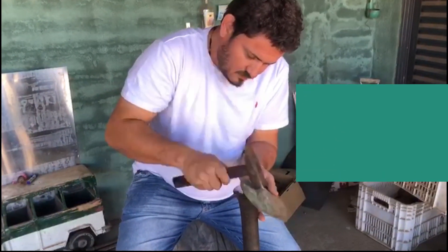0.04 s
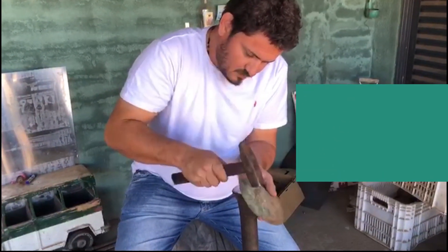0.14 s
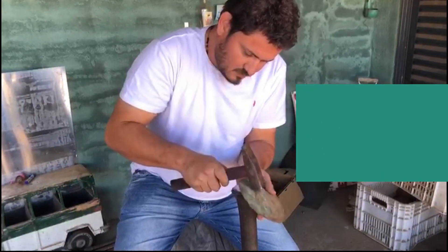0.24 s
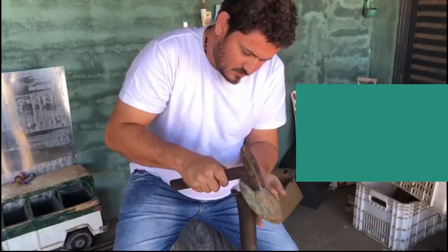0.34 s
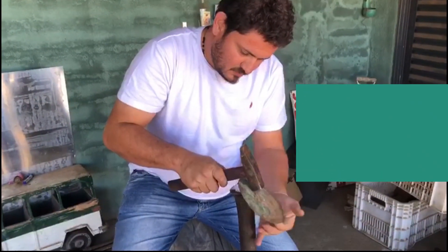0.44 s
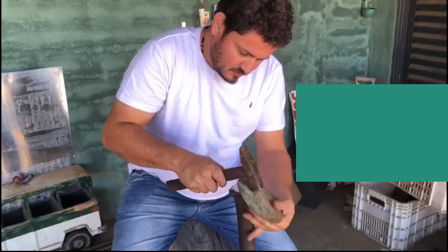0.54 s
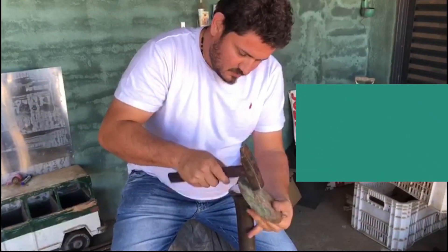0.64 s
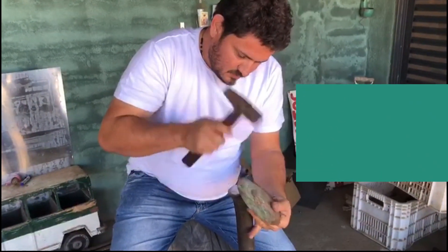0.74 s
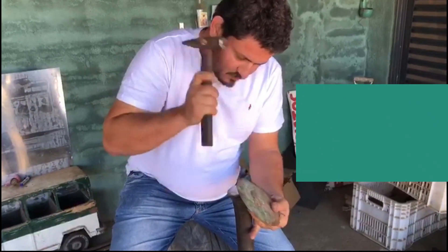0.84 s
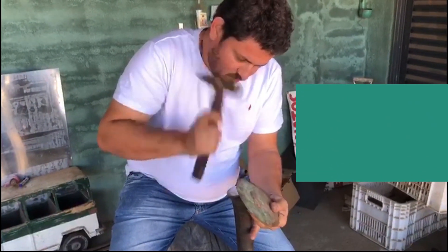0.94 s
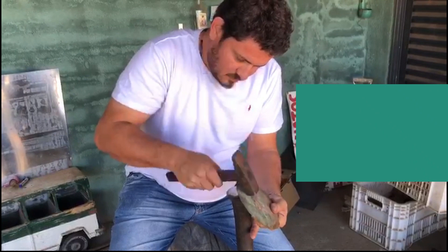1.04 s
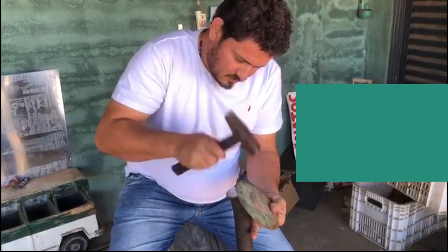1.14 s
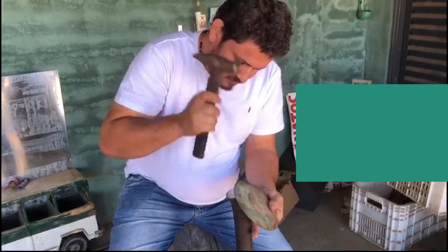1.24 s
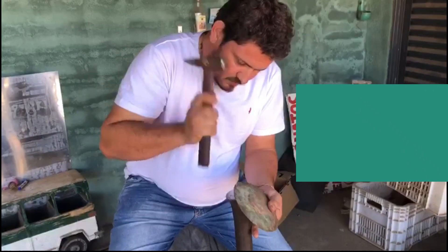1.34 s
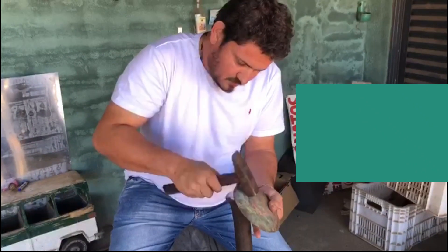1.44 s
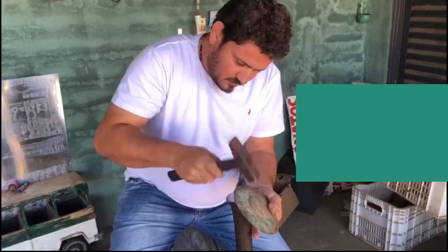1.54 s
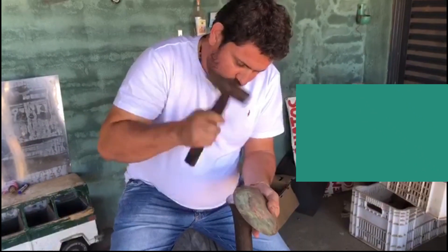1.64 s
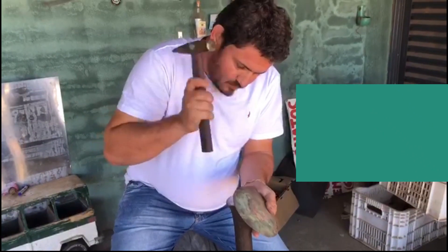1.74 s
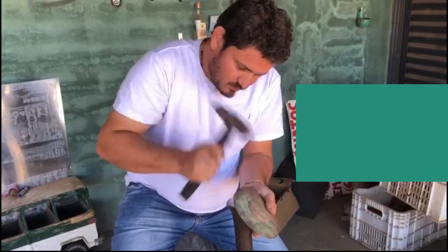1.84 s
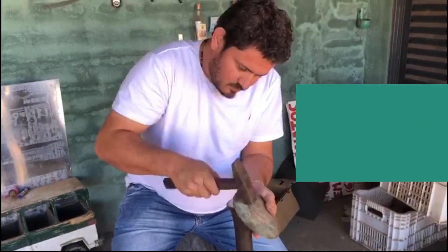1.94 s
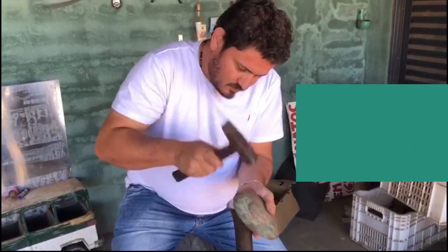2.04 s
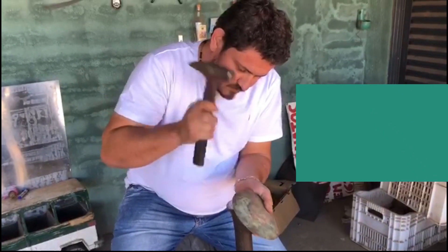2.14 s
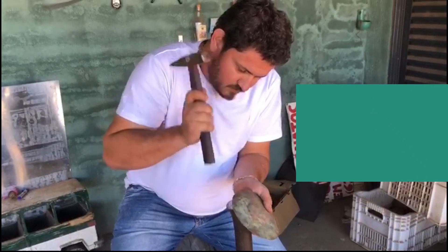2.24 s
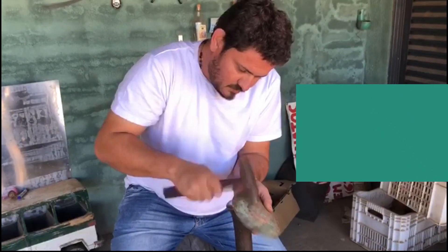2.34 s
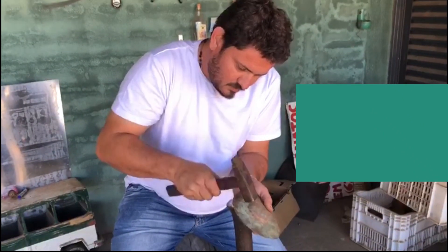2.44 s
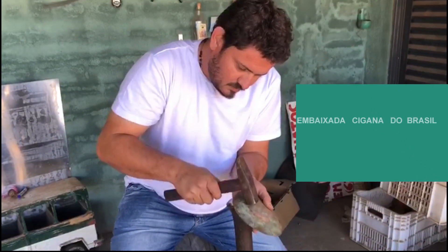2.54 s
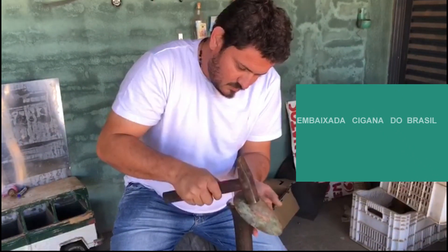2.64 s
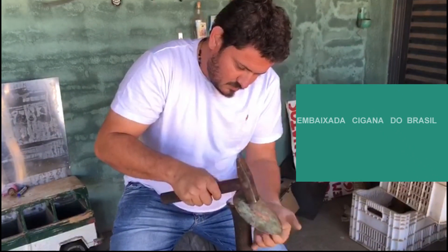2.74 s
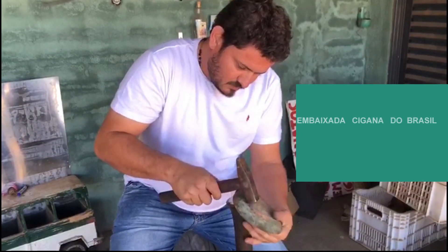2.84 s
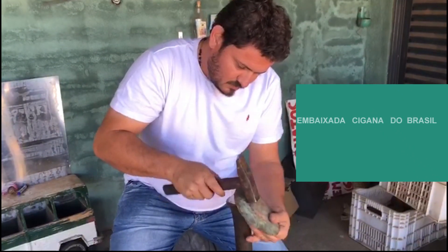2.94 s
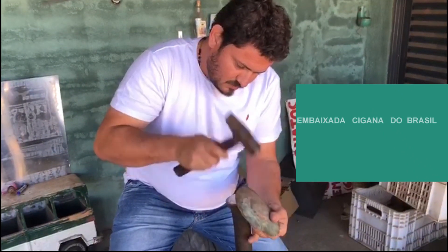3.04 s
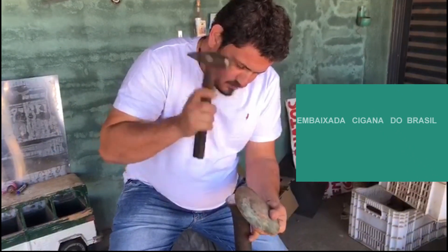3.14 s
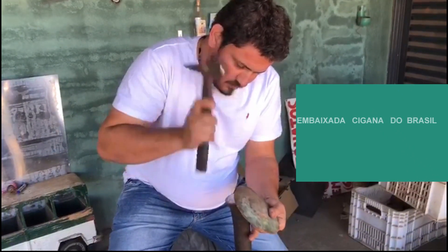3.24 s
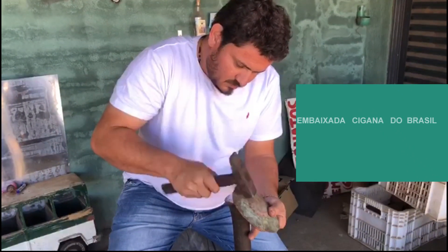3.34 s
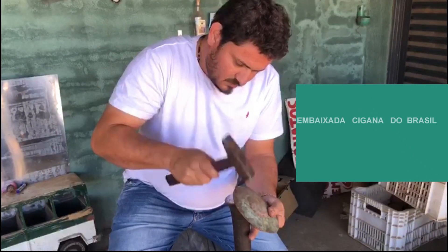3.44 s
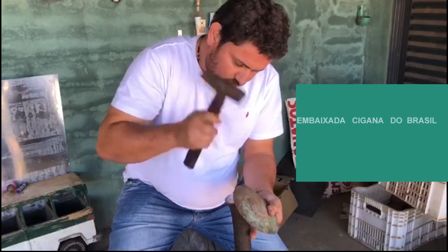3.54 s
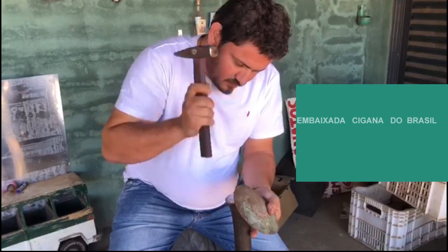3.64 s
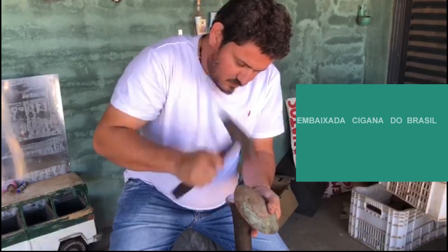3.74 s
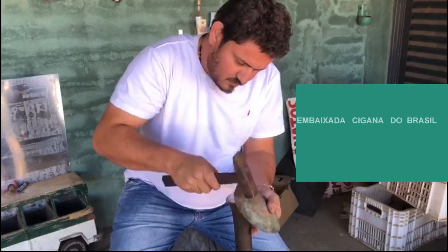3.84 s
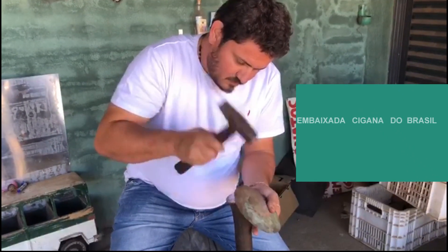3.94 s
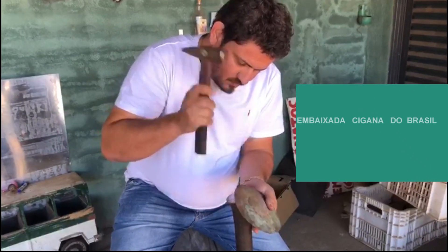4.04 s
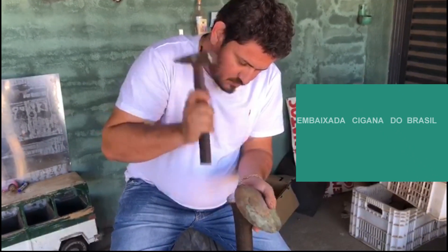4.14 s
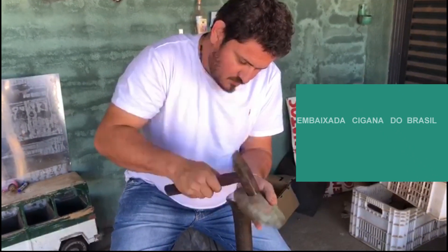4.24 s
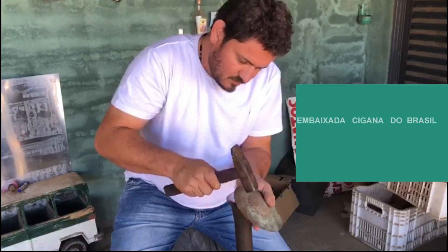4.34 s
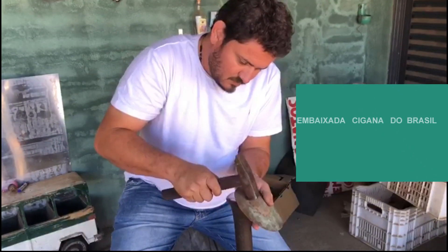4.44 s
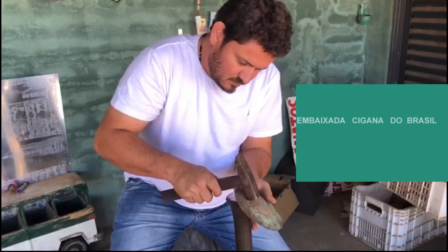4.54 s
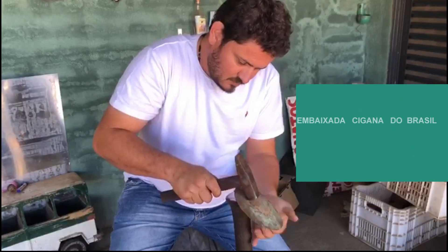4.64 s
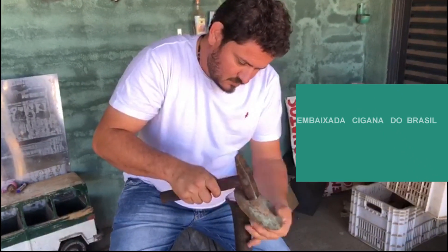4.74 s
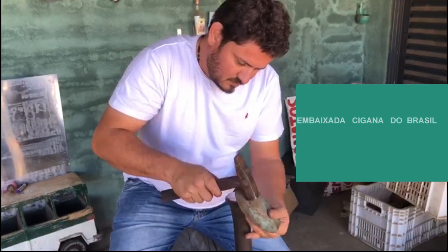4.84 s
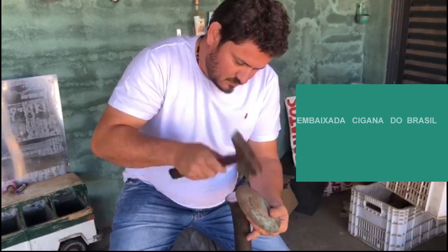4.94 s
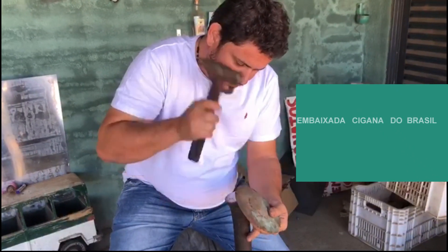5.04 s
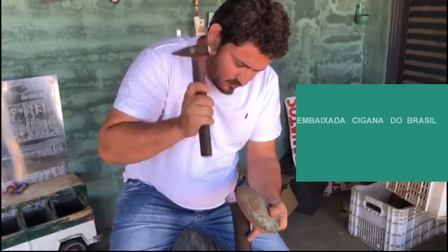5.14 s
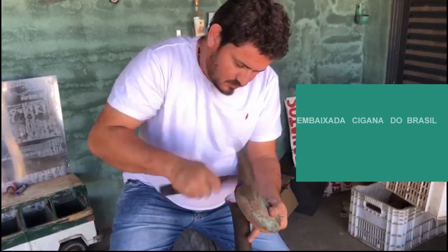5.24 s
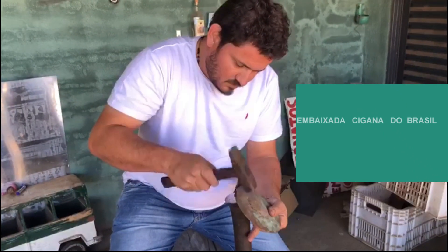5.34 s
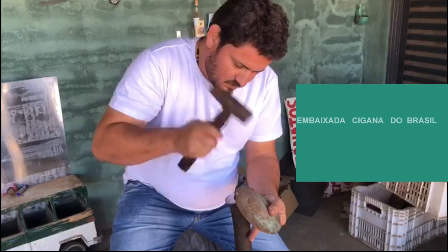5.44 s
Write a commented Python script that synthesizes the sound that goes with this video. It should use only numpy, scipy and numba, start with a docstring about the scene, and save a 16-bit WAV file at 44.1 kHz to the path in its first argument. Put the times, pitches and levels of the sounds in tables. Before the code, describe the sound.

Close mono sound of metalworking: sharp, bright hammer cracks with brief high steel ringing, a dull knock and short boomy reflections. Blows come steadily, with small double-bounce taps on loose copper and slight scraping as the dish turns. A soft low outdoor rumble continues throughout, with barely audible bird whistles. The peaks sound squashed and the extreme treble is cut.

```python
"""The fading ring of an earlier hammer blow comes first, over a low rumble; then a smith beats a small copper dish.
Nine full blows and three light, chattering taps land on a steel stake in a hard-walled workshop.
Each contact is a noise crack and thud plus decaying tones for steel, copper and boom; reflections follow.
The turning dish scrapes (uneven noise) and a far bird whistles (gliding tones). A limiter holds the blows level."""
import sys
import numpy as np
from scipy import signal
from scipy.fft import rfft, irfft
from scipy.io import wavfile
from scipy.ndimage import uniform_filter1d, minimum_filter1d
from numba import njit

SR = 44100
rng = np.random.default_rng(int(sys.argv[2]) if len(sys.argv) > 2 else 0)


def put_to_file(sound):
    """Save the sound as 16-bit audio at rate SR, in the file named by the first command-line argument."""
    columns = np.atleast_2d(sound).T  # one column per channel
    safe = np.clip(columns, -1, 1)
    whole_steps = np.round(safe * 32767)
    wavfile.write(sys.argv[1], SR, whole_steps.astype(np.int16))


N = 242550

# low rumble, its tone colour: [pitch_hz, relative_level_db]
RUMBLE_COLOUR = [(20, -27), (40, -15), (62, 3), (110, -3.5), (170, -3.5), (260, -16.5), (600, -22),
                 (1200, -25.5), (3000, -36), (5000, -42), (8000, -52), (12000, -61.5)]
# how the workshop's reflections die away: [pitch_hz, early_t60_s, late_t60_s, late_relative_to_early_db]
ROOM_DECAY = [(100, 0.16, 1, -4), (293, 0.52, 1, -11), (875, 0.36, 0.8, -18.5), (2570, 0.3, 0.78, -21),
              (5100, 0.26, 0.61, -21), (7850, 0.2, 0.44, -26.5), (11800, 0.12, 0.32, -28)]
# whistles of a bird outside: [start_s, length_s, start_pitch_hz, end_pitch_hz, level_db]
BIRD_CHIRPS = [(0.778, 0.073, 3400, 3280, -73), (0.818, 0.06, 3210, 2915, -60.5),
               (0.837, 0.065, 2345, 2405, -59.5), (5.11, 0.15, 3630, 2970, -63),
               (5.217, 0.41, 2876, 2950, -57.5)]
# copper rubbing on steel, its tone colour: [pitch_hz, relative_level_db]
SCRAPE_COLOUR = [(200, -24), (800, 6), (1500, 9.5), (2500, -17), (5000, -7.5), (8000, -12.5),
                 (12000, -18.5)]
# the dish slides on the stake: [middle_s, length_s, level_db, tilt_db_per_octave]
DISH_SLIDES = [(0.502, 0.18, -45, 0), (0.598, 0.067, -63, -13), (2.867, 0.18, -56, -5.5),
               (3.108, 0.073, -67, 5), (4.966, 0.017, -60, 0.5), (5.02, 0.15, -67, 3),
               (5.167, 0.15, -51, -8)]
# the sharp crack of a contact, its tone colour: [pitch_hz, relative_level_db]
CRACK_COLOUR = [(100, -47.5), (400, -27.5), (850, -14), (1150, -10.5), (1600, 1.5), (2300, -2.5),
                (3400, 6.5), (4300, -1), (6300, 0), (8000, -2.5), (9500, -6.5), (11500, -6.5),
                (14000, -32.5)]
# the dull thud of a contact, its tone colour: [pitch_hz, relative_level_db]
THUD_COLOUR = [(40, -25), (90, -6), (190, -3.5), (300, 7), (420, -9), (700, -4.5), (1100, -8), (2000, -7.5),
               (5000, -47.5)]
# ringing tones of hammer head and stake: [pitch_hz, relative_level_db, t60_s]
STEEL_MODES = [(3219, -1.5, .11), (3240, 0, .14), (3334, -13, .1), (3458, -16, .1), (3735, -12, .1),
               (4990, -18, .1), (6408, -9, .11), (8531, -11, .11), (8548, -7, .18), (11051, -27, .16)]
# ringing tones of the hand-damped dish: [pitch_hz, relative_level_db, t60_s]
COPPER_MODES = [(1105, -10, .13), (1525, -8, .1), (1641, -13, .05), (1827, -15, .05), (2095, -18, .05),
                (2645, -11, .08), (3030, -16, .04), (3262, -15, .06), (4305, -18, .04), (7640, -18, .04)]
# low resonances of stake and room that the thud wakes: [pitch_hz, relative_level_db, t60_s]
BOOM_MODES = [(112, -12, .4), (168, -9, .3), (182, -14, .6), (238, 0, .42), (268, -7, .15), (305, -3, .24),
              (398, -10, .18), (550, -10, .15), (667, -5, .2), (726, -6, .2), (775, -9, .18),
              (860, -10, .18)]
# the hammer drops back onto the dish: [start_s, force_db, first_touch_relative_to_landing_db, copper_ring_db]
HAMMER_TAPS = [(0.353, -23, -6, 10.5), (2.6545, -25, -5, 12), (4.5612, -24, 4.5, 11)]
# full blows; a negative start leaves only the tail: [start_s, force_db, thud_db, top_steel_modes_db]
HAMMER_BLOWS = [(-.42, 4.5, 2, -2), (0.169, -3.5, -3, -1.5), (1.1286, -2, -2, 0), (1.557, -3, -2, 0),
                (2.0079, -3.5, -1.5, 1.5), (2.4804, -4, -2.5, 0.5), (3.4537, -2.5, -0.5, -3),
                (3.899, -3, 4, -1), (4.3595, -3.5, -0.5, -2.5), (5.3806, -5.5, 1, -1)]

T = np.arange(SR) / SR  # one second of time after a contact, in seconds

# base levels in dB; each contact then adds its own changes to most of them
RUMBLE_DB, CRACK_DB, THUD_DB = -45.5, -14, -30.5
STEEL_DB, COPPER_DB, BOOM_DB = -18.5, -30, -32.5
# a tap touches, lands once the dish is pressed onto the stake, and rebounds weakly
LANDING_S, REBOUND_S, REBOUND_DB = .004, .015, -2.5
# dB changes for each kind of contact: a blow rings the steel, a tap the loose copper
BLOW_THUD_DB, BLOW_STEEL_DB, BLOW_TOP_DB, BLOW_COPPER_DB = -2, -2.5, 3, -5.5
TAP_THUD_DB, TAP_STEEL_DB, TAP_TOP_DB = -9.5, -16.5, -1


def undb(db):
    """Turn decibels into a gain."""
    return 10 ** (np.asarray(db) / 20)


def level(x, db):
    """Set a sound to a given rms (average) level."""
    return x * undb(db) / np.sqrt(np.mean(x ** 2))


def fade(t60):
    """A steady die-away that falls 60 dB in t60 seconds."""
    return np.exp(-np.log(1000) * T / max(t60, 1 / SR))


def rise(seconds):
    """A smooth build-up, about two thirds complete after the given time."""
    return 1 - np.exp(-T / seconds)


def swell(length):
    """A smooth rise and fall over the given seconds."""
    return np.sin(np.pi * np.minimum(T / length, 1))


def add(out, at, x):
    """Mix a sound in at a time in seconds, which may lie before the start."""
    i = int(at * SR)
    part = x[max(-i, 0):len(out) - i]
    first = max(i, 0)
    out[first:first + len(part)] += part


def colour(x, spectrum, tilt_db=0):
    """Shape the tone by (Hz, dB) points and a tilt per octave."""
    hz, db = np.transpose(spectrum)
    octave = np.log2(np.maximum(np.fft.rfftfreq(len(x), 1 / SR), 1))
    gain_db = np.interp(octave, np.log2(hz), db) + tilt_db * octave
    return irfft(rfft(x) * undb(gain_db), len(x))


def walk(rate):
    """Random drift with an rms of 1 over the scene, taking a new value `rate` times a second."""
    k = int(SR / rate)
    steps = np.repeat(rng.standard_normal(N // k + 1), k)
    return level(uniform_filter1d(steps, k)[:N], 0)


def workshop(build_s=0.0036):
    """Reflections: near walls die quickly, the rest of the shed lingers, longest in the bass."""
    noise = rfft(rng.standard_normal(SR))
    octave = np.log2(np.arange(len(noise)) + 1)
    centres = np.log2([row[0] for row in ROOM_DECAY])
    tail = 0
    # each row of shares picks out one pitch band, blending into its neighbours
    for share, (_, early, late, late_db) in zip(np.eye(len(ROOM_DECAY)), ROOM_DECAY):
        band = irfft(noise * np.interp(octave, centres, share), SR)
        tail = tail + band * np.hypot(fade(early), undb(late_db) * fade(late))
    tail = tail * rise(build_s)
    return tail / np.linalg.norm(tail)


def heard(x, room, db, direct_db):
    """Direct sound plus reflections, set to a given level over one second."""
    reflections = signal.fftconvolve(x, room)[:SR]
    return level(undb(direct_db) * x + reflections, db)


def rumble():
    """A low outdoor rumble: coloured noise whose loudness drifts gently."""
    noise = colour(rng.standard_normal(N), RUMBLE_COLOUR)
    return level(noise * undb(0.94 * walk(2.9)), RUMBLE_DB)


def bird(room):
    """Faint, gliding whistles, slightly hoarse from pitch jitter and smeared by the walls."""
    out = np.zeros(N)
    for at, length, start_hz, end_hz, db in BIRD_CHIRPS:
        glide = np.interp(T, [0, length], [start_hz, end_hz])
        hz = glide * (1 + .04 * walk(500)[:SR])
        call = np.sin(2 * np.pi * np.cumsum(hz) / SR) * swell(length)
        # a short call keeps its loudness although the level is set over a whole second
        add(out, at, heard(call, room, db + 10 * np.log10(length), direct_db=1.5))
    return out


def slides(room):
    """Copper dragged over steel: noise made of dense, uneven slips."""
    out = np.zeros(N)
    for middle, length, db, tilt_db in DISH_SLIDES:
        slips = rng.standard_normal(SR) * undb(2 * rng.exponential(size=SR))
        rub = colour(slips, SCRAPE_COLOUR, tilt_db) * swell(length)
        add(out, middle - length / 2, heard(rub, room, db + 10 * np.log10(length), direct_db=6.0))
    return out


def ring(modes, room, detune, direct_db, top_db=0):
    """Decaying tones of struck metal; the pressure of each contact shifts their pitch a little."""
    out = 0
    for hz, db, t60 in modes:
        shifted_hz = hz * (1 + detune * rng.standard_normal())
        tone = np.sin(2 * np.pi * shifted_hz * T) * fade(t60)
        out = out + heard(tone, room, db + top_db * (hz > 6000), direct_db)
    return out


def crack(room):
    """Dense sheet modes, heard as a burst of noise with a short and a longer fade."""
    burst = colour(rng.standard_normal(SR), CRACK_COLOUR)
    burst = burst * rise(0.00081) * (fade(0.021) + 0.11 * fade(0.077))
    return heard(burst, room, CRACK_DB, direct_db=7.5)


def thud(room, thud_db):
    """The knock down the stake; the small dish radiates little bass directly, so it builds up in the room."""
    rough = level(rng.standard_normal(SR) * fade(0.73), -5.5)
    knock = colour(level(room, 0) + rough, THUD_COLOUR)
    return level(knock * rise(0.0055) * fade(0.4), THUD_DB + thud_db)


def boom(thud_db):
    """Low resonances of stake and room: decaying tones woken by the thud."""
    tones = sum(undb(db) * np.cos(2 * np.pi * hz * T) * fade(t60) for hz, db, t60 in BOOM_MODES)
    return level(tones * rise(.008), BOOM_DB + thud_db)


def contact(room, thud_db, steel_db, top_db, copper_db):
    """One contact: a crack, a thud down the stake, steel and copper ringing, and a boom."""
    out = crack(room) + thud(room, thud_db)
    out += undb(STEEL_DB + steel_db) * ring(STEEL_MODES, room, detune=0.0016, direct_db=5.5, top_db=top_db)
    out += undb(COPPER_DB + copper_db) * ring(COPPER_MODES, room, detune=0.007, direct_db=2)
    # the boom starts once the thud has reached the walls
    add(out, 0.014, boom(thud_db))
    return out


def taps(room):
    """The dropped hammer chatters on the loose dish: touch, landing, rebound."""
    out = np.zeros(N)
    for at, force_db, touch_db, copper_db in HAMMER_TAPS:
        for delay, db in [(0, touch_db), (LANDING_S, 0), (REBOUND_S, REBOUND_DB)]:
            tap = contact(room, TAP_THUD_DB, TAP_STEEL_DB, TAP_TOP_DB, copper_db)
            add(out, at + delay, undb(force_db + db) * tap)
    return out


def blows(room):
    """Full blows pin the copper to the stake, so the steel rings most."""
    out = np.zeros(N)
    for at, force_db, thud_db, top_db in HAMMER_BLOWS:
        blow = contact(room, BLOW_THUD_DB + thud_db, BLOW_STEEL_DB, BLOW_TOP_DB + top_db, BLOW_COPPER_DB)
        add(out, at, undb(force_db) * blow)
    return out


def scene():
    """Mix the rumble with the bird, slides, taps and blows, which share one room."""
    room = workshop()
    return (rumble() + bird(room) + slides(room) + taps(room) + blows(room))[None]


@njit
def follow(x, attack, release):
    """Track loudness: rise quickly, sink slowly."""
    out, e = np.empty(len(x)), 0.
    for i in range(len(x)):
        e += (x[i] - e) * (attack if x[i] > e else release)
        out[i] = e
    return out


def limiter(x, top_db, attack_s, release_s):
    """Turn the gain down while the sound is over the ceiling, looking a moment ahead."""
    attack = 1 - np.exp(-1 / (attack_s * SR))
    release = 1 - np.exp(-1 / (release_s * SR))
    envelope = follow(np.abs(x), attack, release)
    gain = np.minimum(1, undb(top_db) / np.maximum(envelope, 1 / SR))
    # take the lowest gain nearby, then smooth it (sizes in samples)
    return x * uniform_filter1d(minimum_filter1d(gain, size=41), size=21)


def record(dry):
    """Hold the blows level, round off what slips past, then cut the deep bass and the top."""
    held = limiter(dry[0], top_db=-4.5, attack_s=.00008, release_s=0.011)
    rounded = np.tanh(held)
    high_pass = signal.butter(3, 45, "high", fs=SR, output="sos")  # cut below 45 Hz
    low_pass = signal.ellip(8, .3, 70, 11700, fs=SR, output="sos")  # cut steeply above 11700 Hz
    return signal.sosfilt(low_pass, signal.sosfilt(high_pass, rounded))[None]


dry = scene()
out = record(dry)
put_to_file(out)
```